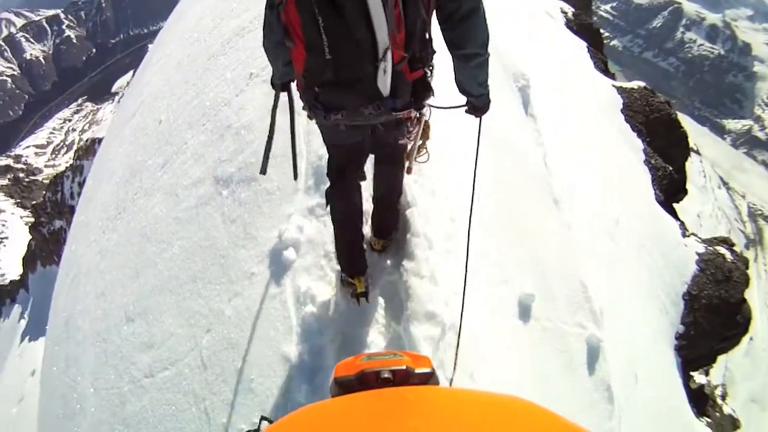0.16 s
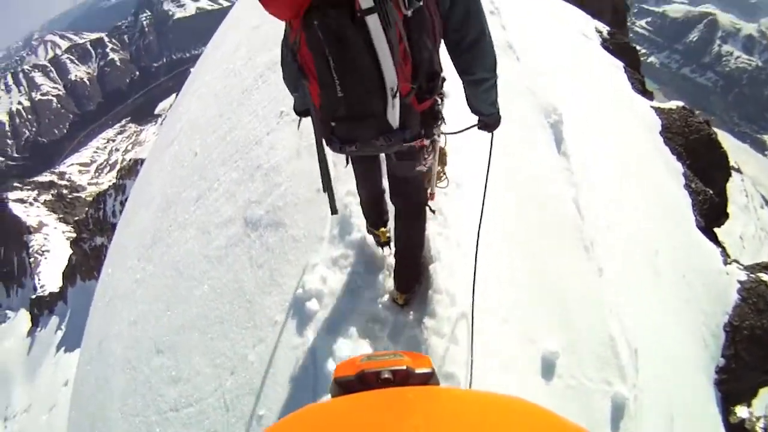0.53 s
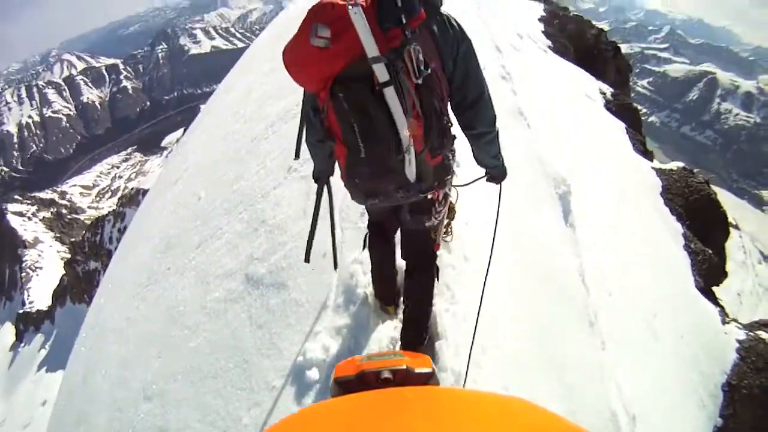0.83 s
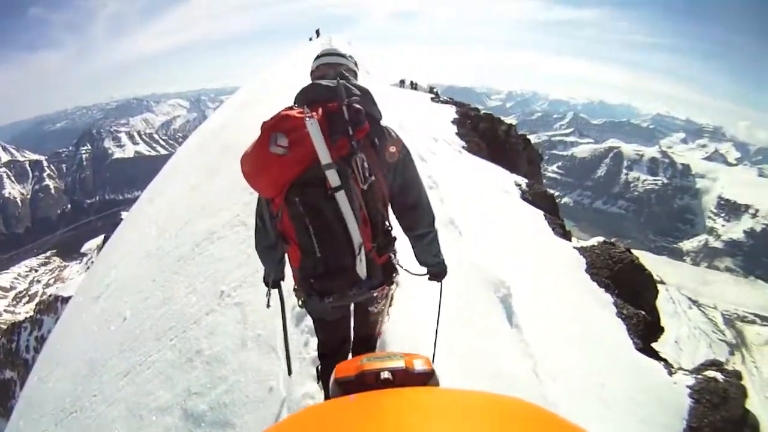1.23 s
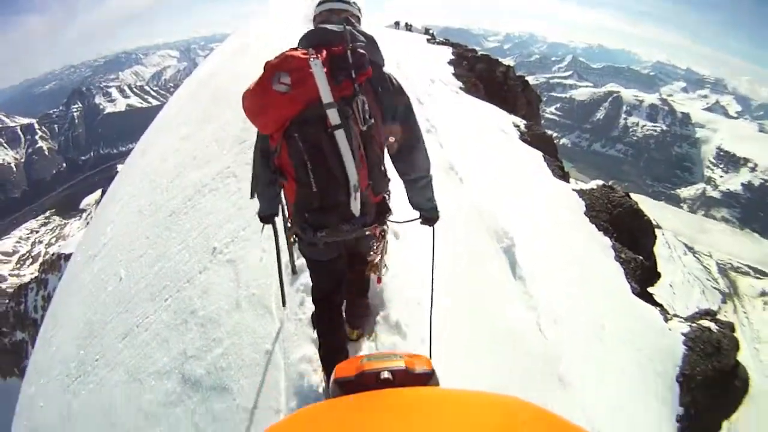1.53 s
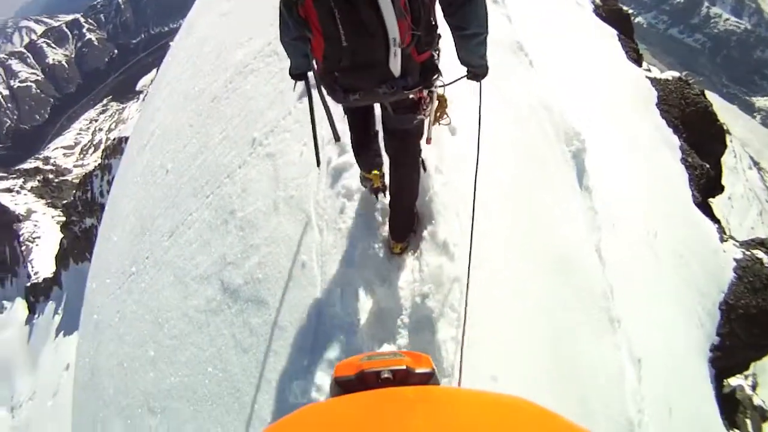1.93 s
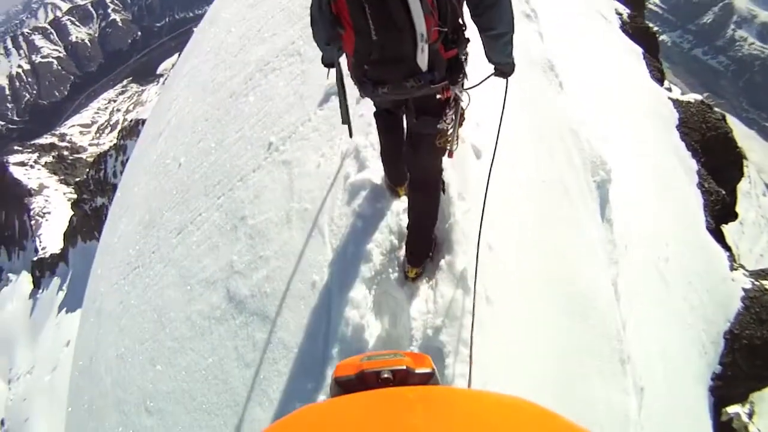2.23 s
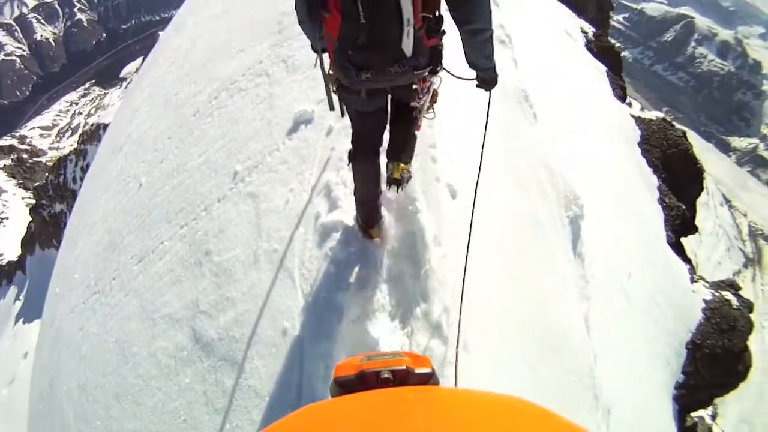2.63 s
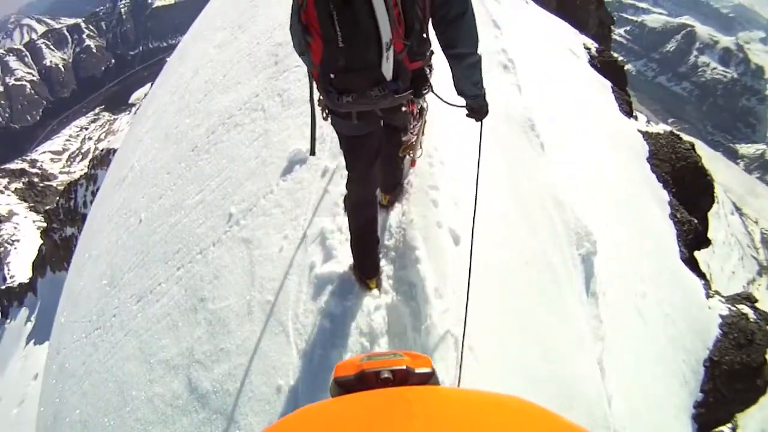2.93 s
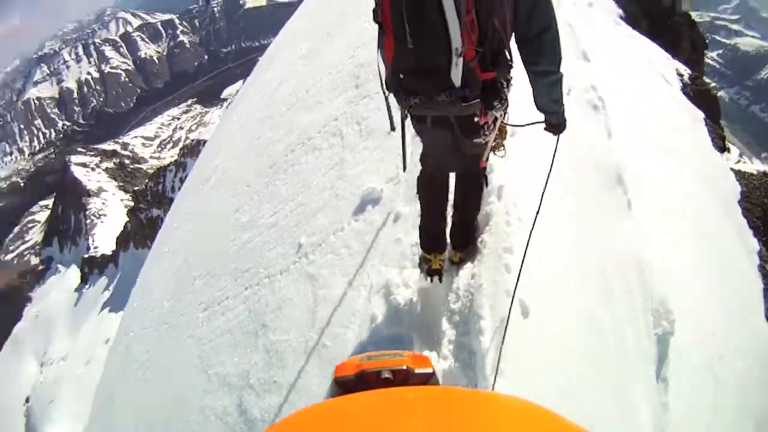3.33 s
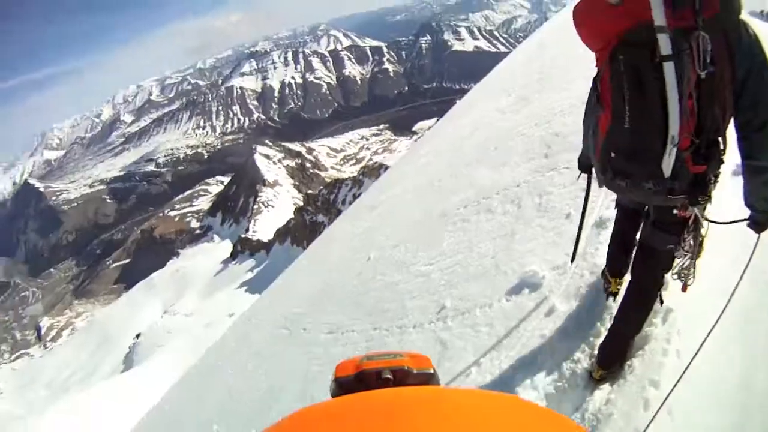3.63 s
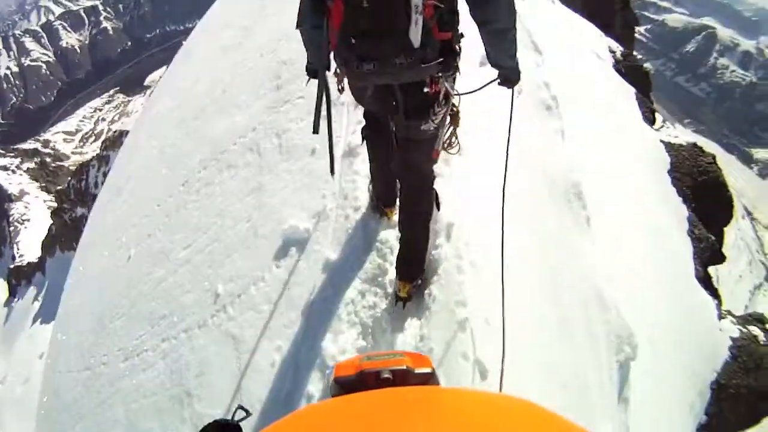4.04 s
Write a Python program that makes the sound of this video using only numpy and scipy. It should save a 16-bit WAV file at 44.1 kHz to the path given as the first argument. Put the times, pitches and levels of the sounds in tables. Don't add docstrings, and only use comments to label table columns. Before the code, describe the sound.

A climber walks slowly on a firm snow ridge, heard from a sealed camera on the helmet. Deep shudders dominate, swelling with footfalls and gusts. Hard plastic knocks click very close, loudest near 1.1 and 2.3 seconds. Behind them, faint boxy crunches and brief squeaks of snow come from below, over steady low hiss. Open outdoor place, no echo.

```python
import sys
import numpy as np
from scipy import signal
from scipy.fft import rfft, irfft, next_fast_len
from scipy.io import wavfile
from scipy.ndimage import uniform_filter1d

SR = 44100
rng = np.random.default_rng(int(sys.argv[2]) if len(sys.argv) > 2 else 0)


def volts_from_db(level):
    exponent = np.asarray(level, float) / 20
    return 10 ** exponent


def store_wav(level_fs):
    pcm = np.round(np.clip(np.atleast_2d(level_fs), -1, 1) * 32767)
    wavfile.write(sys.argv[1], SR, pcm.T.astype(np.int16))


N = 183985

# start t/s, length t/s, swing level/dB, starting pitch f/Hz, lumps re swing level/dB
MOUNT_JOLTS = [(-.03, 0.069, -44.5, 34.02, -21), (0.117, 0.089, -45.5, 33.77, -9),
               (0.187, 0.13, -35.5, 35.63, -15.5), (0.366, .14, -40, 36.48, -12.5),
               (0.838, 0.058, -44.5, 29.82, -9.5), (0.918, 0.079, -30, 34.83, -21),
               (1.01, 0.056, -35.5, 35.95, -10.5), (1.12, .09, -52.5, 36.25, -1),
               (1.326, 0.062, -52, 29.12, -4), (1.664, 0.072, -31.5, 31.07, -22),
               (1.734, 0.19, -35.5, 37.54, -15), (2.151, 0.13, -45.5, 37.24, -16),
               (2.309, 0.079, -24.5, 32.36, -13), (2.415, 0.16, -42, 33.83, -6),
               (2.895, 0.081, -21.5, 34.81, -17), (2.955, 0.26, -29, 37.27, -24),
               (3.571, 0.14, -39, 29.96, -12), (3.689, .14, -28, 34.8, -12),
               (3.849, 0.0506, -49.5, 38.37, -8), (4.083, .07, -45, 38.2, -14)]
# t/s, peak level/dB, middle modes level/dB, high modes level/dB, thud level/dB
STRAP_KNOCKS = [(0.18, -55, -13, -16, -25), (0.9461, -32, -0.5, -21, -28), (1.014, -59.5, 10, 8.5, -18),
                (1.1268, -22.5, 2.5, -16.5, -35.5), (1.3517, -60.5, 13.5, -15, -15),
                (1.5463, -61, 7, 6, -23), (2.1191, -50, 2, -5, -21), (2.3077, -19.5, 4, -17, -38.5),
                (2.3208, -79, -1, -2.5, 1), (2.3525, -52, 6.5, -18, -9), (2.356, -42, -26, -11, -24),
                (2.5148, -53.5, 5, -6, -35), (2.9253, -53.5, 13, 11, -8.5), (2.9376, -39, -2.5, -21, -36),
                (2.9563, -58, 10, 12, -8), (3.721, -37.5, -8, 0.5, -19.5), (3.7252, -59, 24, 5, -9)]
# f/Hz, level/dB, t60 t/s, sign at the capsule
SHELL_THUD = [(135, 0, .03, 1), (232, -1, .05, -1), (430, -7, .015, 1), (580, -6, .012, -1)]
SHELL_LOW = [(757, -27, .045, 1), (1161, 0, .019, 1), (1315, -8, .018, -1)]
SHELL_MIDDLE = [(1632, -2, .015, -1), (1815, -14, .03, -1), (2195, 0, .012, -1), (2650, -12, .013, 1),
                (3050, -21, .012, -1)]
SHELL_HIGH = [(3460, 0, .015, -1), (3720, -3, .011, 1)]
SHELL_TOP = [(4700, 0, .012, 1), (5420, -3, .01, -1)]
# start t/s, length t/s, crunch level/dB, brightness re crunch level/dB
SNOW_BITES = [(-.03, 0.048, -64, -3.5), (.168, 0.019, -62.5, -13), (0.306, 0.21, -69, -12),
              (0.856, .06, -61, -14.5), (.96, 0.15, -68, -14), (1.347, 0.03, -66, -22),
              (1.434, 0.24, -65, -10.5), (1.608, 0.12, -63, -9.5), (1.765, .17, -66.5, -16),
              (1.962, 0.063, -68, -7), (2.1, 0.061, -65.5, -9.5), (2.245, 0.038, -62.5, -18),
              (2.335, 0.035, -57.5, -12), (2.365, 0.26, -63.5, -10), (2.737, 0.097, -64.5, -4),
              (2.831, 0.14, -62.5, -11.5), (2.973, 0.28, -64.5, -13.5), (3.395, 0.09, -66, -5.5),
              (3.558, 0.031, -55.5, -13), (3.66, 0.067, -60, -11), (3.747, .33, -67, -13),
              (4.135, 0.039, -63.5, -18)]
# f/Hz, level/dB, t60 t/s, sign
INLET_BELOW = [(1098, -10.5, 0.026, 1), (1246, 0.5, 0.019, -1), (1518, -7, 0.034, 1),
               (1735, 1.5, 0.014, -1), (2060, 2.5, 0.011, 1), (2204, 1, 0.012, -1), (2656, -4.5, 0.011, 1)]
INLET_ABOVE = [(3454, 2, 0.014, 1), (4070, 3.5, 0.0078, -1), (4490, -3, 0.02, 1), (5150, 0, 0.016, -1)]
# t/s, length t/s, pitch f/Hz, level/dB
SNOW_SQUEAKS = [(0, .03, 1100, -63), (1.635, .09, 5330, -72), (1.64, .08, 4110, -71),
                (1.65, .075, 1100, -67), (1.99, .03, 2150, -65), (1.992, .025, 3570, -69),
                (2.35, .2, 3490, -72), (2.37, .12, 1235, -67), (2.49, .09, 1255, -65),
                (2.58, .08, 1225, -68), (2.747, .015, 2040, -62), (2.78, .035, 1970, -61),
                (2.87, .028, 2060, -61), (2.99, .015, 5410, -68), (3.415, .045, 2650, -68),
                (3.425, .065, 1860, -59), (3.43, .055, 1135, -68), (3.565, .01, 3600, -70),
                (3.57, .017, 3710, -66), (3.572, .035, 1740, -56), (3.576, .022, 2150, -60),
                (3.7, .11, 1720, -66), (3.8, .1, 1745, -66)]
# f/Hz, density level/dB
HISS_COLOUR = [(60, 6), (170, 3), (350, -1.5), (720, -6), (1500, -8), (2700, -11.5), (4600, -13.5),
               (6000, -18)]
# from t/s, to t/s
DULL_SPANS = [
    (.215, .315),
    (1.74, 1.765),
    (2.97, 2.99),
    (3.01, 3.03),
    (3.75, 3.77),
]
# from t/s, to t/s
OPEN_SPANS = [
    (2.306, 2.316),
]

HOLD_HZ = 12000
JOLT_RISE_S, JOLT_SAG_DB_PER_S, JOLT_STOP_S = 0.03, 68, .01
ENVELOPE_STEP = 32


def sway():
    start, length, level_db, start_hz, _ = np.transpose(MOUNT_JOLTS)
    strokes, age = swells(start, length, level_db, JOLT_RISE_S, JOLT_SAG_DB_PER_S, JOLT_STOP_S, linger=0.041)
    pitch = start_hz[:, None] + 3.0 * (1 - np.exp(-np.maximum(age, 0) / 0.151))
    weight = strokes ** 2 + 1e-9
    hz = fine(np.sum(weight * pitch, axis=0) / np.sum(weight, axis=0))
    phase = 2 * np.pi * np.cumsum(hz) / SR + 0.69 * drift(3.6)
    swing = np.sqrt(2) * total(strokes, -108) * volts_from_db(1.87 * drift(6.7))
    tremor = volts_from_db(-56) * rms_one(band(rng.standard_normal(N), 27, 41.5, order=3))
    second = .45 * swing ** 2 * np.cos(2 * phase)
    third = 4.0 * swing ** 3 * np.sin(3 * phase)
    return tremor + swing * np.sin(phase) + second + third


def buffet():
    start, length, level_db, _, lump_db = np.transpose(MOUNT_JOLTS)
    shaken, _ = swells(start, length, level_db + lump_db, rise_s=.02, sag_db_per_s=146, stop_s=.015, linger=0.053)
    push_db = level_db - 8.5
    strokes, _ = swells(start, length, push_db, JOLT_RISE_S, JOLT_SAG_DB_PER_S, JOLT_STOP_S, linger=0.034)
    lumps = evened(band(rng.standard_normal(N), 49.2, 73.7, order=3), .1)
    push = evened(band(rng.standard_normal(N), 15.9, 24.3), 0.087)
    flutter = volts_from_db(1.5 * drift(10.0))
    leaning = uniform_filter1d(total(strokes, calm_db=-59.5), int(0.11 * SR))
    return total(shaken, calm_db=-71) * flutter * lumps + leaning * push


def knocks():
    start, peak_db, middle_db, high_db, thud_db = np.transpose(STRAP_KNOCKS)
    at = ((start + .0012) * SR).astype(int)
    hardest = peak_db == peak_db.max()
    top_db = -17 + 0.86 * high_db + 11.5 * hardest
    groups = (
        (SHELL_THUD, thud_db + 16),
        (SHELL_LOW, .1),
        (SHELL_MIDDLE, middle_db - 5.0),
        (SHELL_HIGH, high_db - 2.0),
        (SHELL_TOP, top_db),
    )
    out = 0
    for modes, share_db in groups:
        force = np.zeros(N)
        force[at] = -volts_from_db(peak_db + share_db)
        out = out + housing(force, modes)
    return signal.lfilter(np.hanning(5) / 2, 1, out)


def crunch():
    start, length, level_db, bright_db = np.transpose(SNOW_BITES)
    creep_db, creep_bright_db = -72.5, -13
    loads, _ = swells(start, length, level_db, rise_s=0.0099, sag_db_per_s=17.5, stop_s=0.012, linger=0.13)
    sizes = volts_from_db(3.4 * np.minimum(rng.exponential(1, (2, N)), 3)) * rng.choice([-1, 1], (2, N))
    grains_per_s = 4000 * volts_from_db(1.8 * drift(30.0))
    low, high = sizes * (rng.random((2, N)) < grains_per_s / SR)
    dark_part = total(loads, creep_db) * evened(housing(low, INLET_BELOW), .03)
    bright = total(loads * volts_from_db(bright_db)[:, None], creep_db + creep_bright_db)
    return dark_part + bright * rms_one(housing(high, INLET_ABOVE))


def squeaks():
    out, white = np.zeros(N), rng.standard_normal(N + 4000)
    for start, length, hz, level_db in SNOW_SQUEAKS:
        i, n = int(start * SR), int(length * SR)
        t60 = 60 / hz
        once = ring(white[i:i + n + 4000], hz, t60)
        tone = ring(once, hz, t60)[4000:]
        out[i:i + n] += volts_from_db(level_db) * evened(tone, 0.022) * np.hanning(n) ** .5
    return out


def hiss():
    hz = np.maximum(np.fft.rfftfreq(N, 1 / SR), 1)
    table = np.array(HISS_COLOUR)
    colour = volts_from_db(np.interp(np.log(hz), np.log(table[:, 0]), table[:, 1]))
    colour = colour * (hz > 40) * (hz < HOLD_HZ / 2)
    return volts_from_db(-63) * rms_one(irfft(rfft(rng.standard_normal(N)) * colour, N))


def housing(force, modes):
    return sum(np.sign(sign) * volts_from_db(db) * ring(force, hz, t60) for hz, db, t60, sign in modes)


def ring(clicks, hz, t60):
    r, w = volts_from_db(-60 / (t60 * SR)), 2 * np.pi * hz / SR
    return signal.lfilter([0, np.sin(w)], [1, -2 * r * np.cos(w), r * r], clicks + 1e-18)


def swells(start, length, level_db, rise_s, sag_db_per_s, stop_s, linger):
    age = np.arange(0, N, ENVELOPE_STEP) / SR - start[:, None]
    length = length[:, None]
    rise_s, stop_s = rise_s + 2 * linger * length, stop_s + linger * length
    rise = np.sin(np.pi / 2 * np.clip(age / rise_s, 0, 1)) ** 2
    sag_db = sag_db_per_s * np.maximum(age - rise_s, 0)
    after = np.maximum(age - length, 0)
    return volts_from_db(level_db[:, None] - sag_db) * rise * np.exp(-after / stop_s), age


def total(envelopes, calm_db):
    return fine(np.sqrt(np.sum(envelopes ** 2, axis=0) + volts_from_db(2 * calm_db)))


def fine(coarse):
    return np.interp(np.arange(N), np.arange(0, N, ENVELOPE_STEP), coarse)


def drift(rate):
    r = np.exp(-2 * np.pi * rate / SR)
    return rms_one(signal.lfilter([1], [1, -2 * r, r * r], rng.standard_normal(N + SR))[SR:])


def band(x, low_hz, high_hz, order=2):
    return signal.sosfilt(signal.butter(order, [low_hz, high_hz], "band", fs=SR, output="sos"), x)


def evened(x, span_s):
    return rms_one(x / np.sqrt(uniform_filter1d(x ** 2, int(span_s * SR)) + 1e-12))


def rms_one(x):
    return x / np.sqrt(np.mean(x ** 2) + 1e-20)


def during(spans):
    t = np.arange(N) / SR
    return uniform_filter1d(sum(((t > a) & (t < b)) * 1. for a, b in spans), size=132)


def scene():
    return (sway() + buffet() + knocks() + crunch() + squeaks() + hiss())[None]


def band_limit(x):
    return signal.sosfilt(signal.butter(12, 16840, fs=SR, output="sos"), x)


def record(dry):
    size = next_fast_len(N + SR // 10)
    hz = np.fft.rfftfreq(size, 1 / SR)
    guarded = irfft(rfft(dry, size) / (1 + (hz / 5800) ** 42.0), size)
    sampled = guarded * (1 + 2 * np.cos(2 * np.pi * HOLD_HZ * np.arange(size) / SR))
    held = rfft(sampled) * np.sinc(hz / HOLD_HZ) / np.sinc(hz / (4 * HOLD_HZ))
    body = irfft(held * (hz < 12800), size)[:, :N]
    upper = irfft(held * (hz >= 12800) * (hz < 15300), size)[:, :N]
    top = irfft(held * (hz >= 15300) * (hz < 16800), size)[:, :N]
    mix = body + upper * (1 - during(DULL_SPANS)) + top * during(OPEN_SPANS)
    return band_limit(mix)


dry = scene()
out = record(dry)
store_wav(out)
```